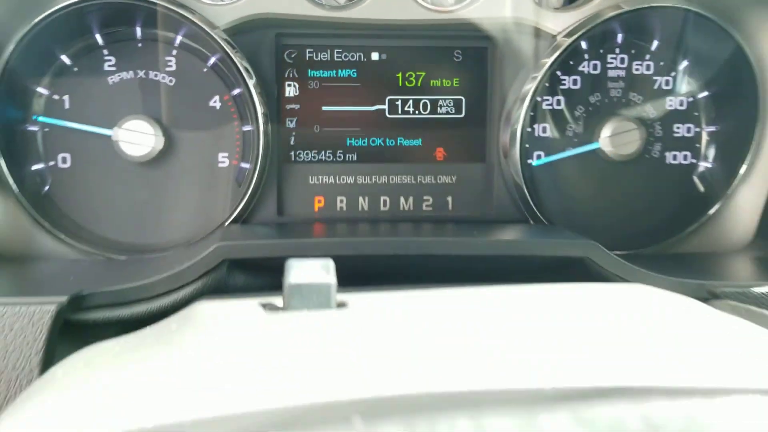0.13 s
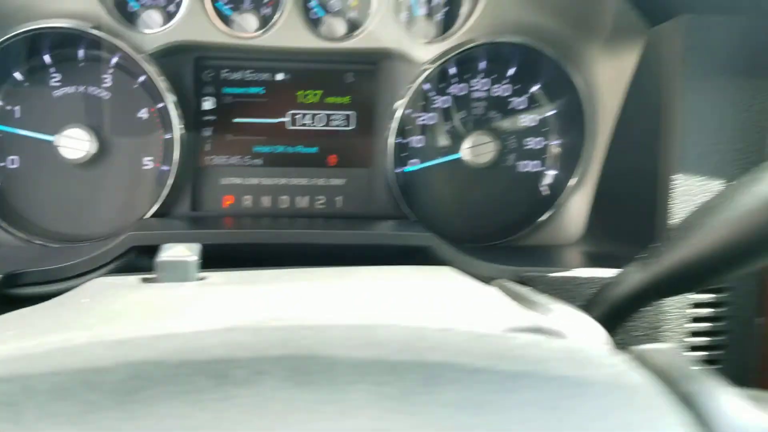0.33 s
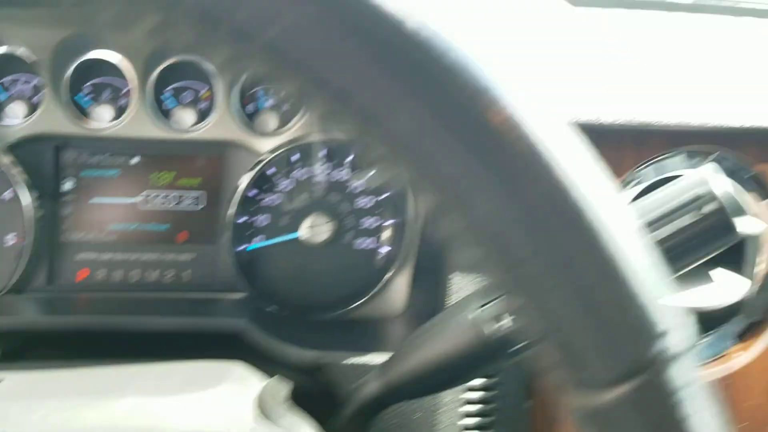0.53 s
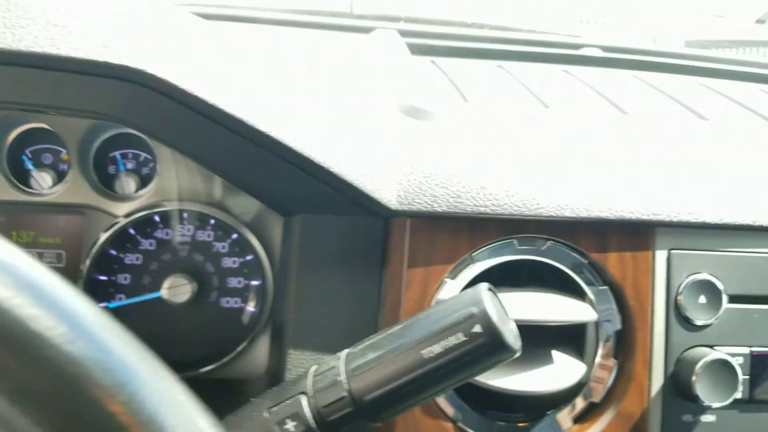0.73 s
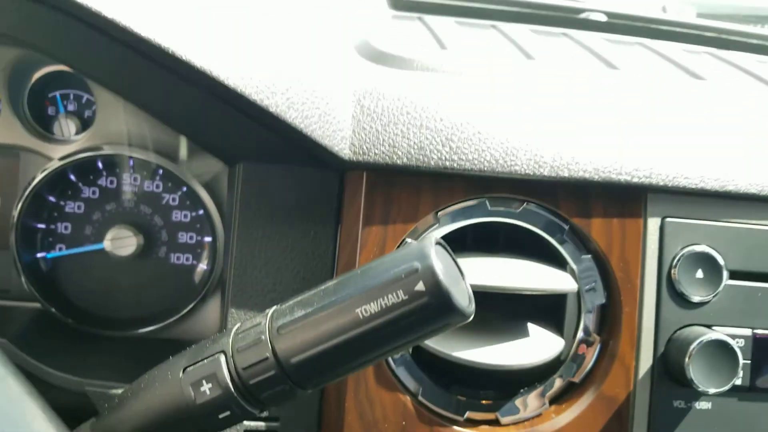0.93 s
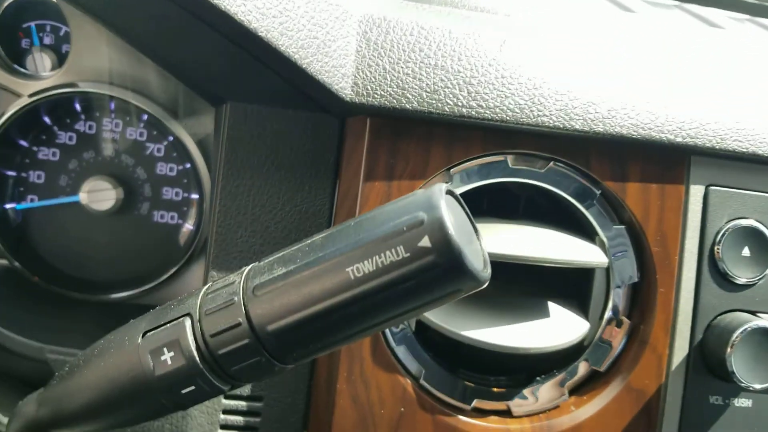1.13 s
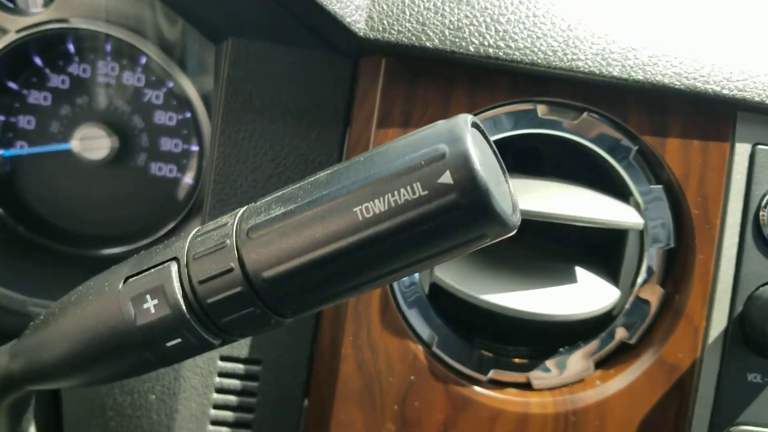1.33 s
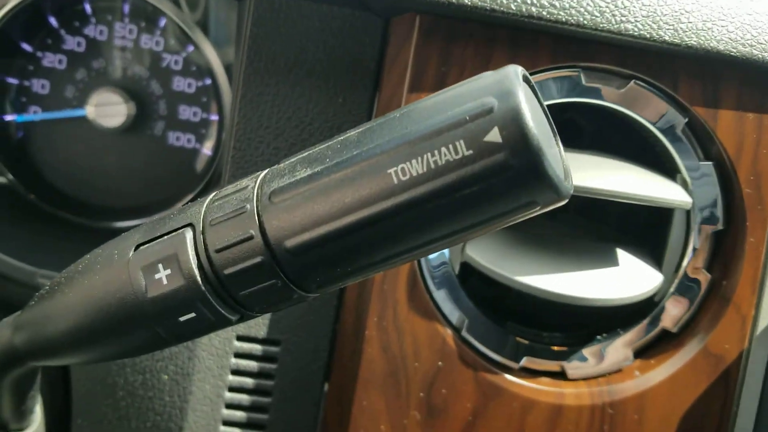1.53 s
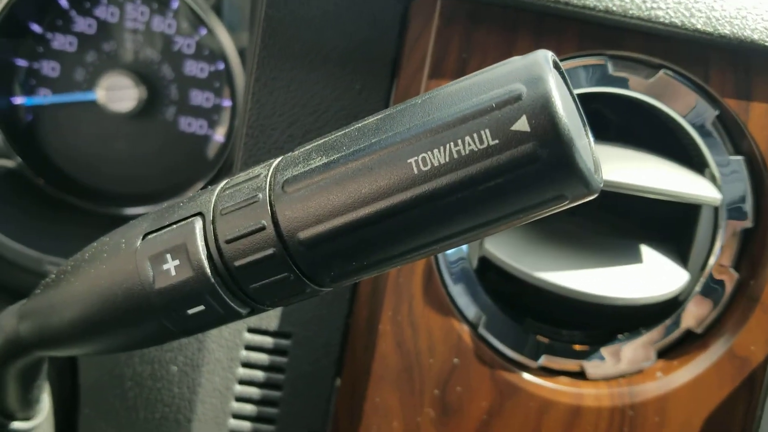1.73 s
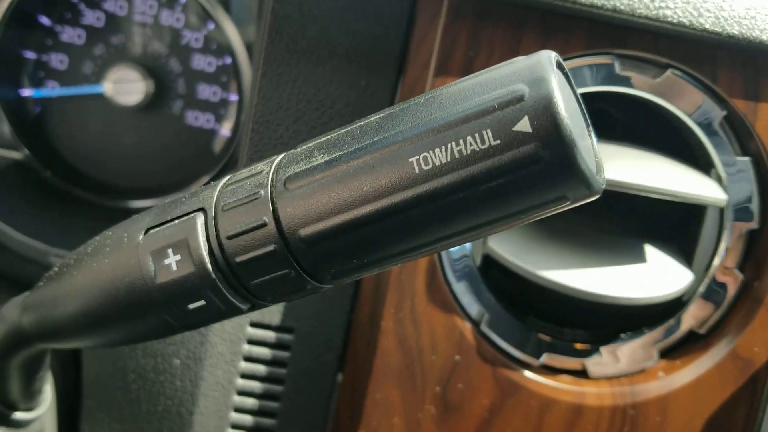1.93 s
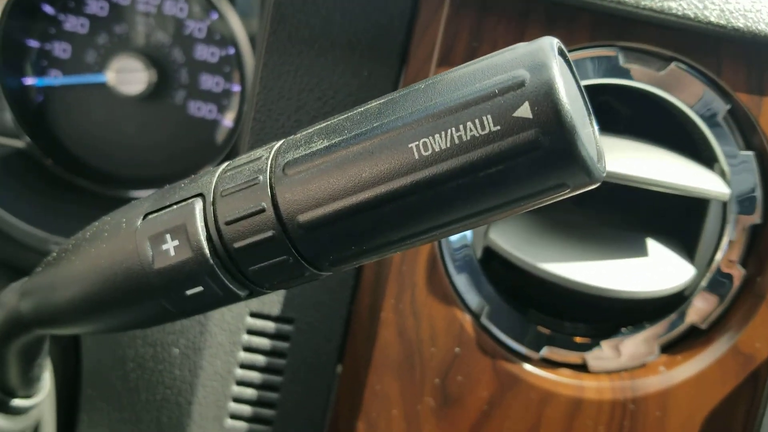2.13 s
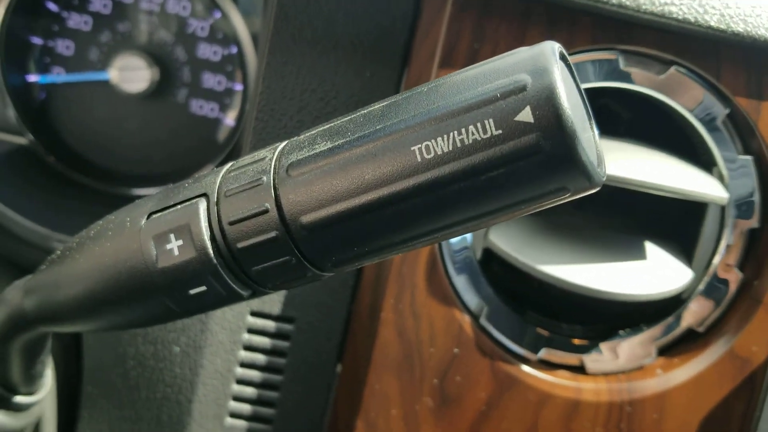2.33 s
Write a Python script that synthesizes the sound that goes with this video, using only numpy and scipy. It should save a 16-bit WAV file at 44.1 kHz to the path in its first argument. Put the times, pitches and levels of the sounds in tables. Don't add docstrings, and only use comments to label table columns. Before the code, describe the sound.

Diesel engine idling, deep and uneven, heard from the cab with soft fan hiss and faint ticks

```python
import sys
import numpy as np
from scipy import signal
from scipy.fft import rfft, irfft
from scipy.io import wavfile
from scipy.ndimage import uniform_filter1d, map_coordinates

SR = 44100
rng = np.random.default_rng(int(sys.argv[2]) if len(sys.argv) > 2 else 0)


def file_out(sig):
    cols = np.atleast_2d(sig).T
    lim = np.clip(cols, -1, 1)
    pcm = np.round(lim * 32767).astype(np.int16)
    wavfile.write(sys.argv[1], SR, pcm)


def how_loud(loudness_db):
    steps = np.asarray(loudness_db, float) / 20
    return 10 ** steps


N = 108971

# time in seconds, place from 0 (wheel) to 1 (dash centre).
CAMERA_PATH = [
    (0, 0.04),
    (.3, 0.079),
    (.55, 0.61),
    (1.05, 0.95),
    (2.47, 1),
]

# frequency in Hz, level in dB per Hz.
RUMBLE_SPECTRUM = [(20, -22), (45, -10), (100, -1), (170, -5), (230, -11), (400, -19.5), (1100, -19),
                   (1900, -43.5)]
# frequency in Hz, likeness up to 1.
RUMBLE_ALIKE = [(100, .95), (300, .7), (700, .45), (1200, .75)]
RUMBLE_DB, RUMBLE_MOVE_DB, RUMBLE_SWAY_DB = -43.5, 3, 0.5
RUMBLE_LEAD_S = 0.000358

# frequency in Hz, level in dB per Hz.
VENT_SPECTRUM = [(900, -5), (1500, 4), (1850, 5), (3300, 2), (4800, 0), (5800, -10), (9000, -19),
                 (16000, -47)]
AIR_SPECTRUM = [(4500, -15), (6500, -1), (8000, 0), (10000, -3), (11800, -5), (13200, -3), (15800, 3)]
# frequency in Hz, likeness up to 1.
VENT_ALIKE = [(1500, 0.097), (4000, 0.06), (14000, 0.19)]
# frequency in Hz, left over right in dB.
VENT_PAN = [(1200, 1), (2400, -1), (4400, 2), (10000, 0), (14000, 8)]
# time in seconds, hiss in dB, fine top in dB.
FLOW = [
    (0, 2, -2),
    (.45, 3.5, 1),
    (.75, 4, 0.5),
    (1.15, 1.5, 1),
    (1.6, 1, 0),
    (1.9, 0.5, 0),
    (2.2, 0, 2),
    (2.27, -0.5, -5),
    (2.47, 1, -8),
]
VENT_DB, AIR_DB, VENT_LAG_S = -53.5, -59, 0.00042

# frequency in Hz, level in dB per Hz.
CLOTH_SPECTRUM = [(1500, -25), (1780, -1), (2200, 0), (2500, -16), (3300, -16), (3600, -6), (4000, -20),
                  (12000, -32)]
CRACKLE_SPECTRUM = [(3000, -32), (7000, -9), (12500, -9), (14500, 4), (16000, 0)]
SLEEVE_SPECTRUM = [(5000, -5), (8000, 4), (10500, 6), (13000, -6)]
# time in seconds, length in seconds, level in dB, brightness in dB, left over right in dB.
RUBS = [
    (.16, 0.024, -57.5, 16, 3),
    (0.347, 0.12, -64.5, 13, -1),
    (0.564, 0.037, -52.5, 8, -4),
    (1.49, 0.096, -53, -12, -2),
    (1.72, 0.15, -55, -21, -5),
]
# time in seconds, length in seconds, level in dB.
SLEEVE = (1.51, 0.12, -61)
CLOTH_PATCH_DB = 1.2

# time in seconds, peak in dB, left over right in dB.
TICKS = [
    (0.2603, -47, 7.0),
    (0.805, -65, 57),
    (1.3518, -50, 21),
    (1.911, -47, 18),
    (2.4573, -50, 16.5),
]
TICK_HZ, TICK_S, LATE_S = 14900, 0.00025, 0.0013
PRE_S, PRE_DB = 0.002, -20

FIRING = [1, 2, 3, 4, 5, 6, 7, 8, 10, 13, 14, 16]
FIRING_DB = [-24, -30, -49, -45, -56, -61, -63, -73, -73, -70, -70, -75]
LOPE = [6, 7, 9, 11, 13, 14, 15, 17, 18, 19, 20, 21, 22, 23, 25, 26, 27, 28, 29, 30, 31, 33, 34, 35, 36, 37,
        38, 43]
LOPE_DB = [-61, -59, -56, -45, -46, -52, -53, -44, -39, -37, -45, -47, -48, -59, -53, -53, -46, -51, -58,
           -43, -53, -50, -44, -46, -49, -55, -48, -61]
UNEQUAL = [(.85, -.6, -.9), (2.8, -.8, -.1), (3.87, -1, 1), (6.8, .6, -.25)]
# frequency in Hz, wheel over dash in dB.
CAB_WAVES = [(40, -3), (80, 3.5), (110, 0.5), (170, 2), (280, 5), (600, 6.5)]
# frequency in Hz, left over right in dB.
BOOM_PAN = [(40, -.5), (80, 1.5), (170, 3), (280, 3), (1200, 1)]
FIRING_HZ, CYLINDERS = 40.68, 8
CYCLE_HZ = FIRING_HZ / CYLINDERS
PUMP_HZ, PUMP_DB = 109.3, -42
HARD_FIRING_S = 0.101
SMEAR, EDGE, CRANK_SWAY = 0.15, 1.7, 0.005
PANEL_HZ = 118
BOOM_LEAD_S = 0.0003
EVEN_SWAY_DB, LOPE_SWAY_DB = 0.3, 0.9

TOP_HZ = 15830


def unit(x):
    return x / np.sqrt(np.mean(x ** 2) + 1e-20)


def along(points, hz):
    f, v = np.transpose(points)
    return np.interp(np.log(hz + 1), np.log(f + 1), v)


def wobble(rate):
    knots = rng.standard_normal(int(N * rate / SR) + 4)
    return map_coordinates(knots, [np.arange(N) * rate / SR])


def sides(pan_db, lead_rad=0):
    half = pan_db / 2 * np.log(10) / 20 + 0.5j * lead_rad
    return np.exp([half, -half])


def near_wheel():
    return 1 - np.interp(np.arange(N) / SR, *np.transpose(CAMERA_PATH))


def rush(spectrum, alike, pan, lead_s, patchy_db):
    z = signal.stft(rng.standard_normal((2, N + 1024)), nperseg=512)[2]
    field = uniform_filter1d(rng.standard_normal(z.shape[1:]), size=6, axis=0)
    field = uniform_filter1d(field, size=10, axis=1)
    patchy = signal.istft(z * how_loud(patchy_db * unit(field)), nperseg=512)[1][:, :N]
    a, b = rfft(patchy)
    hz = np.fft.rfftfreq(N, 1 / SR)
    u = np.arccos(np.clip(along(alike, hz), -1, 1)) / 2
    pair = np.array([a * np.cos(u) + b * np.sin(u), a * np.cos(u) - b * np.sin(u)])
    shape = how_loud(along(spectrum, hz)) * (hz > 12)
    return unit(irfft(pair * shape * sides(along(pan, hz), 2 * np.pi * hz * lead_s), N))


def panel_rumble():
    rumble = rush(RUMBLE_SPECTRUM, RUMBLE_ALIKE, BOOM_PAN, RUMBLE_LEAD_S, patchy_db=0.6)
    return rumble * how_loud(RUMBLE_DB + RUMBLE_MOVE_DB * near_wheel() + RUMBLE_SWAY_DB * wobble(9.78))


def vent_blower():
    s, *levels = np.transpose(FLOW)
    flow_db, top_db = (np.interp(np.arange(N) / SR, s, level) for level in levels)
    vent = rush(VENT_SPECTRUM, VENT_ALIKE, VENT_PAN, -VENT_LAG_S, patchy_db=0.95)
    air = rush(AIR_SPECTRUM, VENT_ALIKE, VENT_PAN, -VENT_LAG_S, patchy_db=2.2)
    hiss = vent * how_loud(VENT_DB + flow_db + 0.4 * wobble(11.9))
    return hiss + air * how_loud(AIR_DB + top_db + 0.6 * wobble(23))


def swell(s, length, db):
    t = np.arange(N) / SR
    return how_loud(db) * np.exp(-((t - s) / length) ** 2)


def cloth():
    centred = [(1000, 0)]
    body = rush(CLOTH_SPECTRUM, [(1000, 0.23)], centred, 0, CLOTH_PATCH_DB)
    crackle = rush(CRACKLE_SPECTRUM, [(1000, 0.3)], centred, 0, CLOTH_PATCH_DB) * how_loud(2.5 * wobble(400))
    soft = rush(SLEEVE_SPECTRUM, [(1000, 0.18)], centred, 0, CLOTH_PATCH_DB)
    out = swell(*SLEEVE) * soft
    for s, length, db, bright_db, pan in RUBS:
        rub = body + how_loud(bright_db - 10.5) * crackle
        out = out + swell(s, length, db) * sides(pan).real[:, None] * rub
    return out


def tick(s, db):
    t = np.arange(N) / SR - s
    return how_loud(db + 3) * np.exp(-(t / TICK_S) ** 2) * np.sin(2 * np.pi * TICK_HZ * t)


def relay():
    out = np.zeros((2, N))
    for s, db, pan in TICKS:
        close_s = s + LATE_S
        both = tick(close_s, db) + tick(close_s - PRE_S, db + PRE_DB)
        out = out + sides(pan).real[:, None] * both
    return out


def boom_tone(hz, db, phase, sway_db):
    gain = np.sqrt(2) * how_loud(db + along(CAB_WAVES, hz) * near_wheel() + sway_db * wobble(3.8))
    ears = sides(along(BOOM_PAN, hz), 2 * np.pi * hz * BOOM_LEAD_S)
    return (ears[:, None] * gain * np.exp(1j * phase)).real


def gather(order):
    after, floor, dash = np.transpose(UNEQUAL)
    push = floor if order * CYCLE_HZ < PANEL_HZ else dash
    return np.angle(np.sum(push * np.exp(-2j * np.pi * order * after / CYLINDERS))) + EDGE


def engine():
    t = np.arange(N) / SR
    cycle = 2 * np.pi * CYCLE_HZ * (t - HARD_FIRING_S) + CRANK_SWAY * wobble(3.48)
    out = boom_tone(PUMP_HZ, PUMP_DB, 2 * np.pi * PUMP_HZ * t + 0.31 * wobble(2.8), 0.5)
    for k, db in zip(FIRING, FIRING_DB):
        phase = k * CYLINDERS * cycle + EDGE
        out = out + boom_tone(k * FIRING_HZ, db, phase, EVEN_SWAY_DB * np.sqrt(k))
    for k, db in zip(LOPE, LOPE_DB):
        phase = k * cycle + gather(k) + SMEAR * rng.normal()
        out = out + boom_tone(k * CYCLE_HZ, db, phase, LOPE_SWAY_DB)
    return out


def scene():
    return panel_rumble() + vent_blower() + cloth() + relay() + engine()


def low_pass(x):
    return signal.sosfilt(signal.butter(12, 16490, fs=SR, output="sos"), x)


def record(dry):
    heard = np.fft.rfftfreq(N, 1 / SR) < TOP_HZ
    mix = irfft(rfft(dry) * heard, N)
    return low_pass(mix)


dry = scene()
out = record(dry)
file_out(out)
```